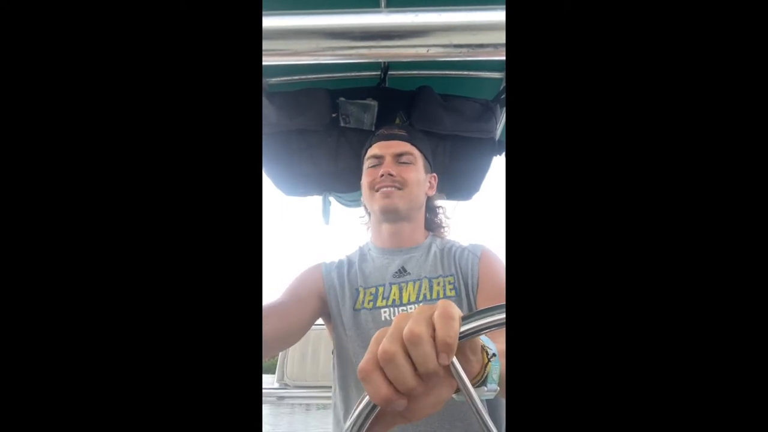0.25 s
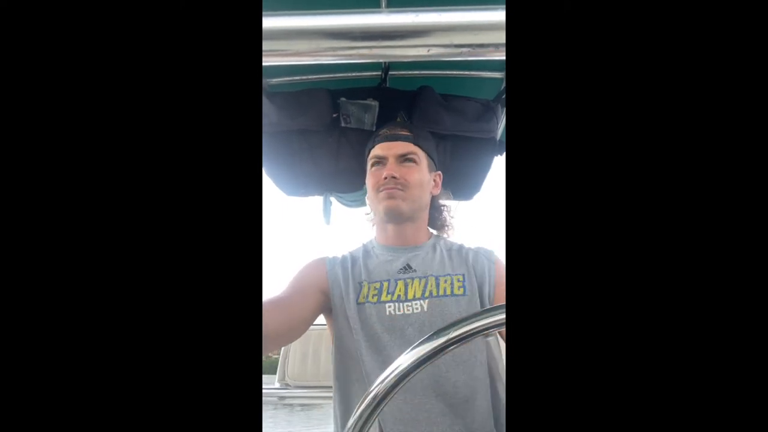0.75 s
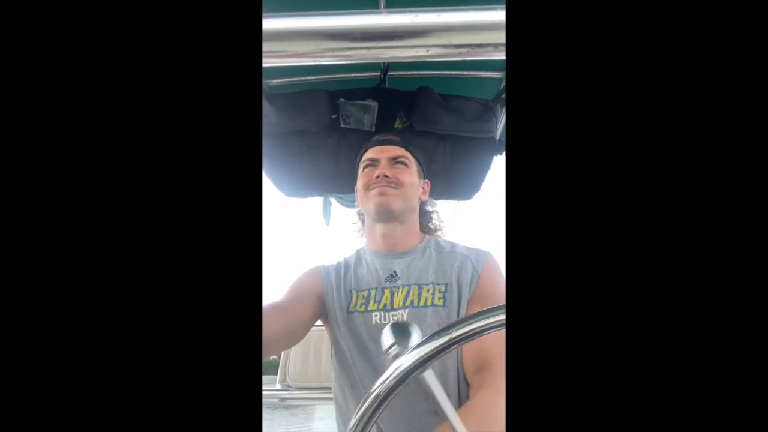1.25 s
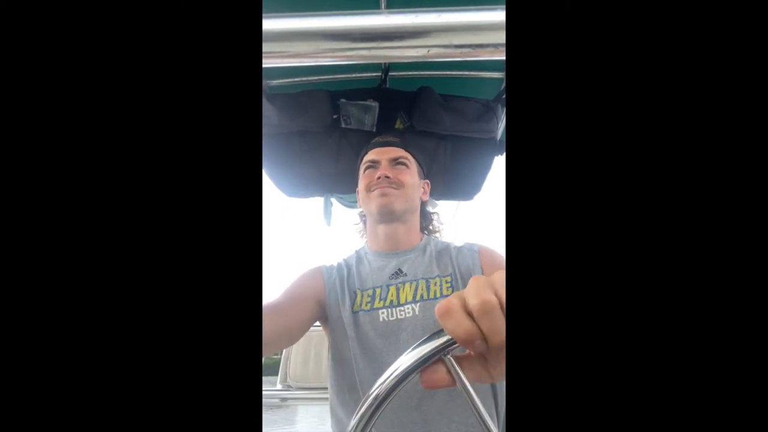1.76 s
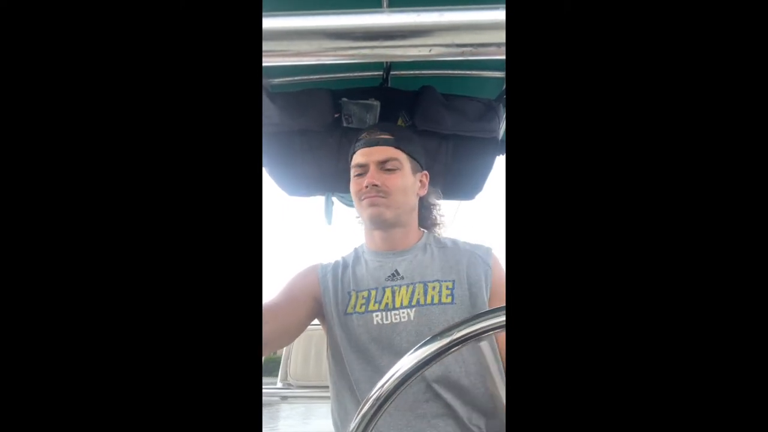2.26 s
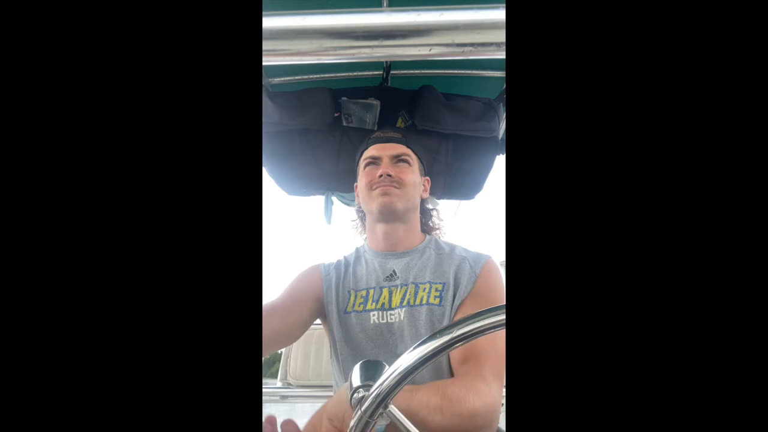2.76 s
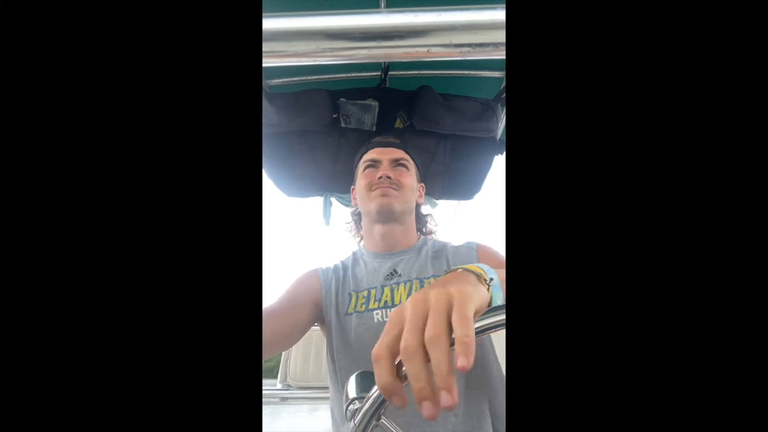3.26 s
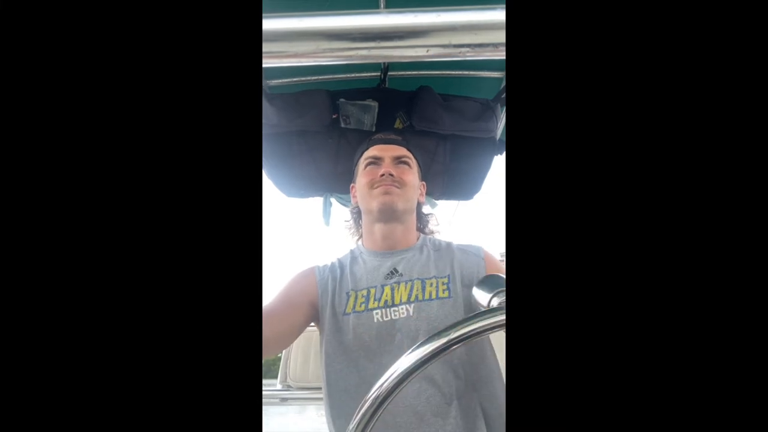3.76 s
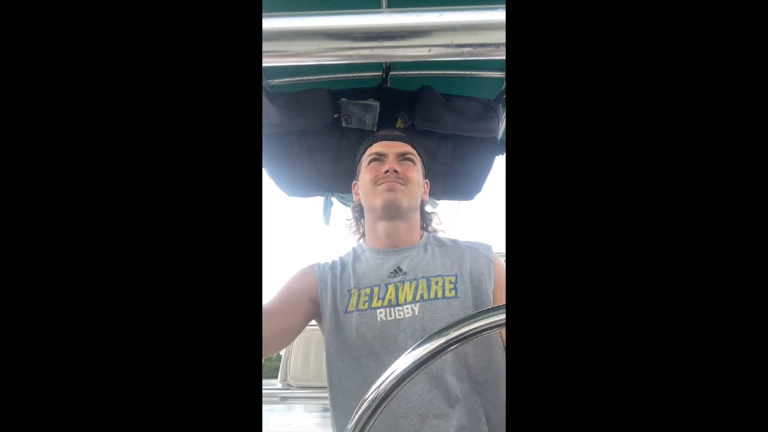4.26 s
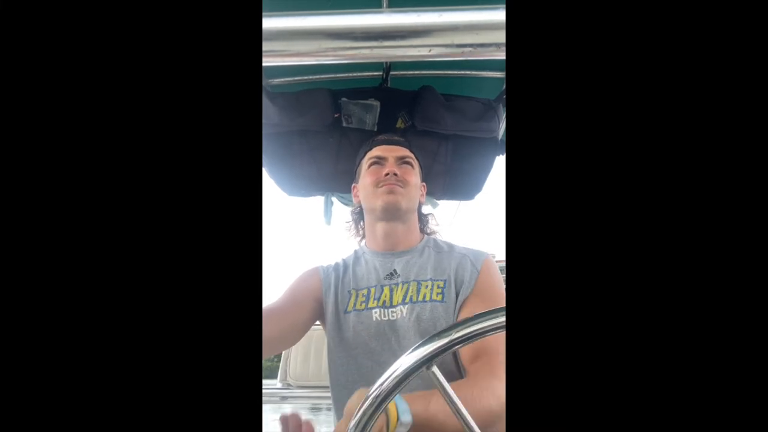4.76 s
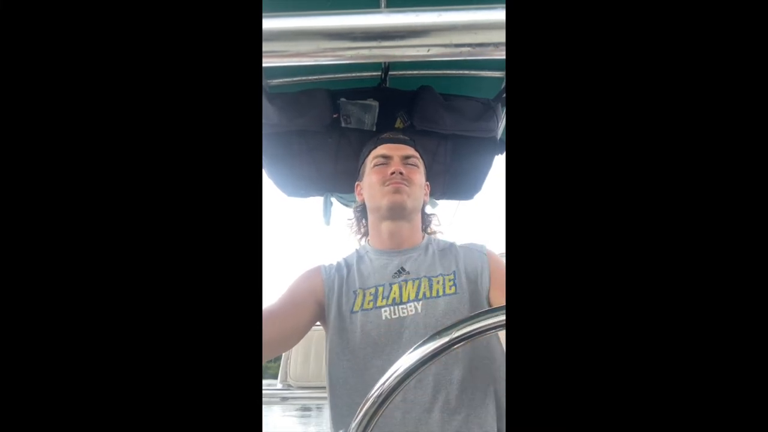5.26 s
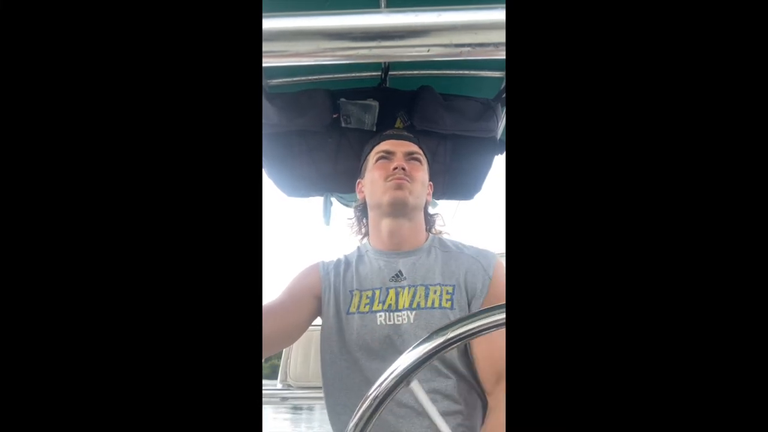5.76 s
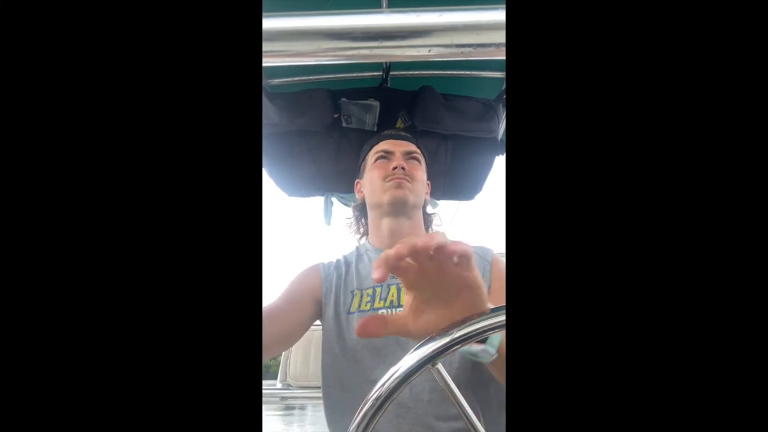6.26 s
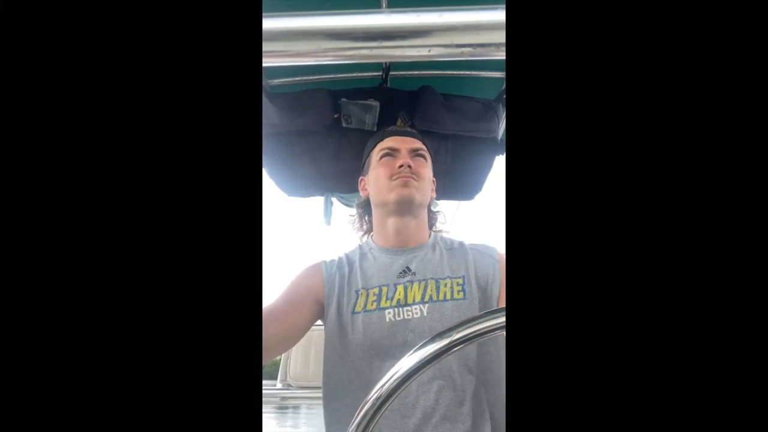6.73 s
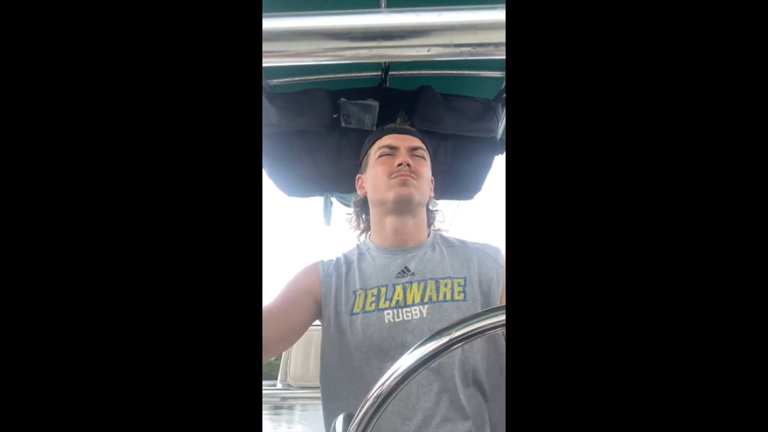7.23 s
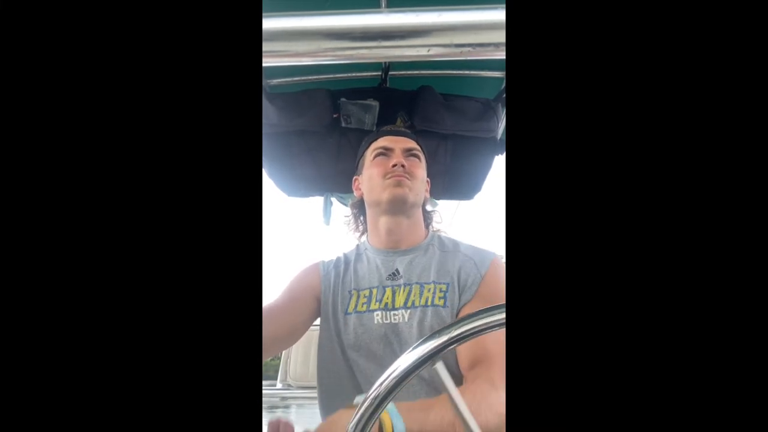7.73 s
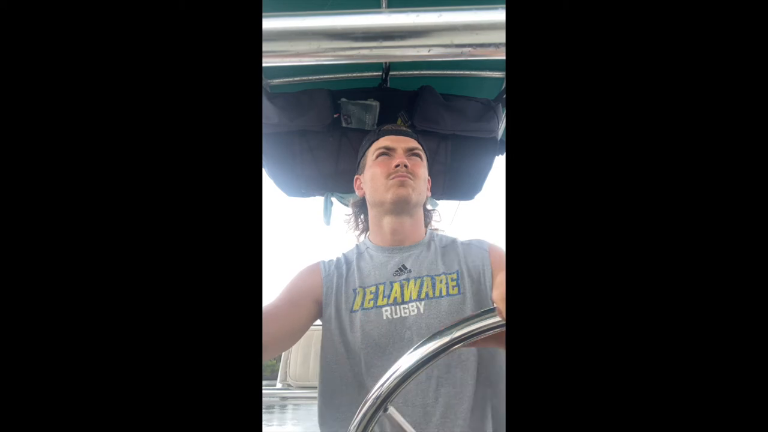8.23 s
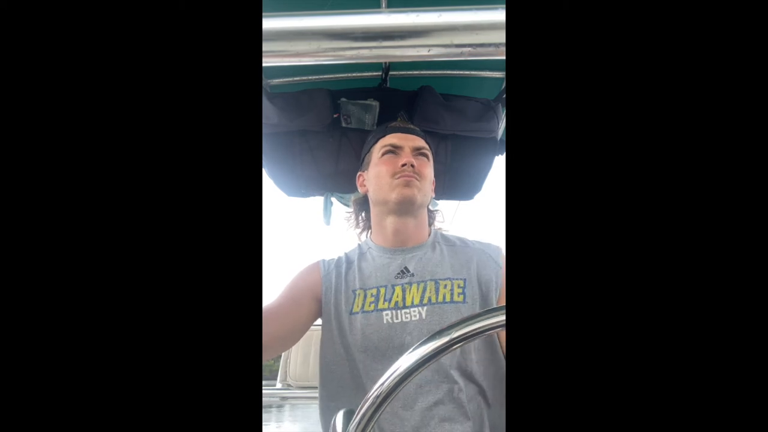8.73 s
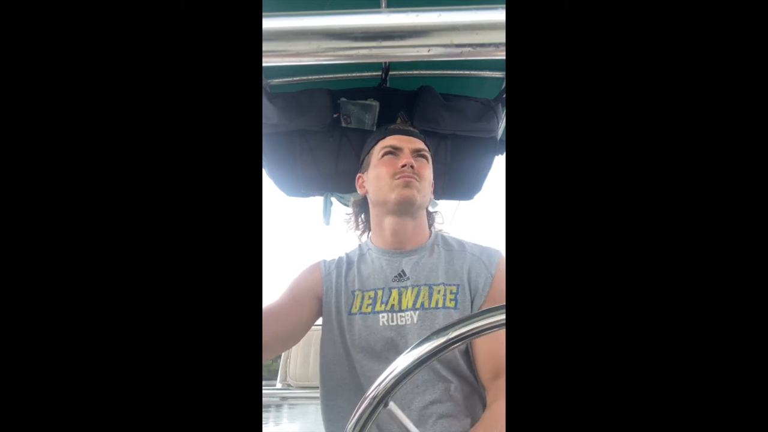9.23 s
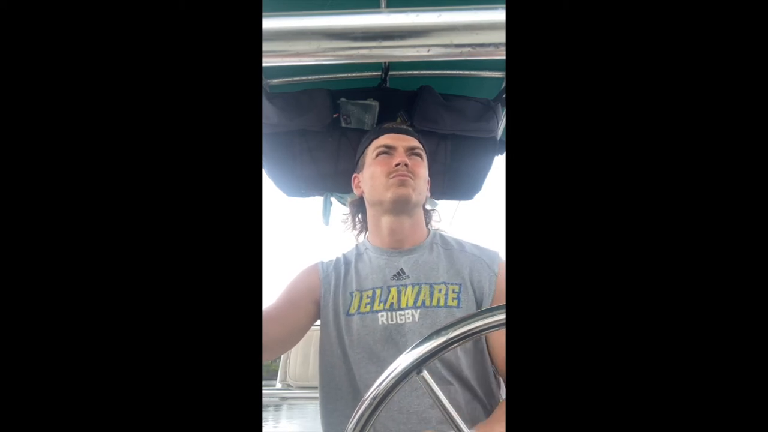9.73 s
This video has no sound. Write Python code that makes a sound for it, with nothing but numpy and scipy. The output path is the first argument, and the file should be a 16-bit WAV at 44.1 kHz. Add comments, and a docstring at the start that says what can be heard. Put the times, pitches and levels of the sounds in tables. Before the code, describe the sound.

Low boat-engine rumble pulses unevenly under soft water hiss, as wheel spins give brief ratcheting grinds, small metallic ticks and dull console knocks.

```python
"""Outboard motor at low speed

Heard by a phone on the console of an open boat: noise through the resonances of hull, deck, panels and
rails makes an uneven, throbbing boom, hum and rattle; strong exhaust beats are short tone bursts.
Shaped noise makes the water wash and spray hiss. When the wheel is spun, the steering gear grinds as
trains of tooth impulses and pings; single ticks and dull knocks are short decaying bursts."""
import sys
import numpy as np
from scipy import signal
from scipy.fft import rfft, irfft, next_fast_len
from scipy.io import wavfile
from scipy.ndimage import uniform_filter1d

SR = 44100
rng = np.random.default_rng(int(sys.argv[2]) if len(sys.argv) > 2 else 0)


def transcribe(signal):
    """Save signal, clipped to [-1, 1], as a 16-bit WAV file at the path in sys.argv[1]."""
    frames = np.atleast_2d(signal).T
    limited = np.clip(frames, -1, 1)
    pcm = np.round(limited * 32767).astype(np.int16)
    wavfile.write(sys.argv[1], SR, pcm)


N = 440559
T = np.arange(N) / SR
SIZE = next_fast_len(N)
HZ = np.maximum(np.arange(SIZE // 2 + 1) * SR / SIZE, 1.)

# likeness of the sound at the phone's two ports: (frequency [Hz], likeness [0-1])
LIKENESS = [(60, .97), (180, .98), (320, .95), (450, .45), (6000, .35), (8300, .95), (16000, .82)]
# level difference of the ports: (frequency [Hz], left minus right [dB])
PORT_TILT = [(60, 1.5), (110, 2.0), (200, 1.5), (270, -1.5), (400, -1), (520, 3), (800, 3.0), (1290, 1.5),
             (2380, 0.5), (4400, 1.5), (8120, 0.5), (15000, 0.0)]
# phase that the right port gains on its detour round the console: (frequency [Hz], phase [rad])
PORT_DETOUR = [(400, 0), (480, -2), (600, -1), (1200, -3), (1700, -4), (2400, -9), (4200, -14), (6500, -21)]
# spins of the wheel: (start [s], length [s], level [dB], swell by the end [dB], mean tooth rate [Hz])
WHEEL_SPINS = [(0.585, .36, -46, -2, 75.04), (0.961, 0.17, -49, 3, 62.7), (1.136, 0.21, -41.5, -2.5, 65.3),
               (1.842, .2, -47, -5, 62.6), (2.066, .3, -44, -2.5, 70.35), (2.441, .5, -51.5, -12, 71.7),
               (3.155, .8, -57.5, -1.5, 68.8), (4.186, .42, -47.5, 3.5, 72.74),
               (5.034, 0.092, -59, 3.5, 59.6), (5.218, .68, -50, 5.5, 62.1), (6.053, .7, -61.5, -3.5, 68.4),
               (6.841, .55, -56, 7, 58.1), (7.424, .36, -46.5, 0, 69), (8.031, 0.14, -57, 5.5, 54.1),
               (8.298, .2, -45, -3, 49.74), (8.551, 0.72, -52, 1.5, 32.95), (9.394, 0.76, -70, -4, 30.4)]


def undb(db):
    """Decibel definition: amplitude gain is ten to the level over twenty."""
    return 10 ** (np.asarray(db) / 20)


def unit(x):
    """Normalisation of power: scaled to rms 1."""
    return x / np.sqrt(np.mean(x ** 2))


def curves(table):
    """Piecewise linear control: each column after time as a value per sample."""
    s, *columns = np.transpose(table)
    return [np.interp(T, s, column) for column in columns]


def slope(points):
    """Spectral envelope: a value per frequency, straight on a log axis."""
    hz, value = np.transpose(points)
    return np.interp(np.log(HZ), np.log(hz), value)


# between the ports: a detour in phase up to the middle, then a steady lag in the treble
PORT_LAG_S, PORTS_AGREE_HZ = 0.00018, 8580
DETOUR_PHASE = np.interp(HZ, *np.transpose(PORT_DETOUR))
LAG_PHASE = -2 * np.pi * (HZ - PORTS_AGREE_HZ) * PORT_LAG_S
PATH = np.exp(1j * np.where(HZ < PORT_DETOUR[-1][0], DETOUR_PHASE, LAG_PHASE))
LEAN = undb(slope(PORT_TILT) / 2)  # half the difference for each port
LIKE_BY_HZ = slope(LIKENESS)


def resonant(modes):
    """Modal superposition: gain per frequency of steep resonances whose powers add."""
    power = sum(undb(2 * db) / (1 + (2 * (HZ - hz) / width) ** 2) ** 2 for hz, width, db in modes)
    return np.sqrt(power)


def walk(rate):
    """Smoothed random modulation: levels held 1 / rate s and slewed twice, rms 1."""
    k = int(SR / rate)
    held = np.repeat(rng.standard_normal(N // k + 1), k)
    return unit(uniform_filter1d(uniform_filter1d(held, k), k)[:N])


def lurching(level_db, depth_db):
    """Amplitude modulation: a gain whose level wanders at random."""
    return undb(level_db + depth_db * walk(14.))


def ports(drive, colour, like=LIKE_BY_HZ, path=PATH):
    """Partial coherence: the right port hears a share of the left port's filtered noise along the path."""
    a, b = rfft(drive * rng.standard_normal((2, N)), SIZE) * colour
    like = np.clip(like, 0, 1)
    right = like * path * a + np.sqrt(1 - like ** 2) * b
    return irfft(np.array([a * LEAN, right / LEAN]), SIZE)[:, :N]


def ringing(drive, modes):
    """Resonance: one noise under the envelope drive through modes, rms 1."""
    spectrum = rfft(drive * rng.standard_normal(N), SIZE)
    return unit(irfft(spectrum * resonant(modes), SIZE)[:N])


def fading(times, sizes, decay_s):
    """Exponential decay: an envelope that jumps at each time and dies away."""
    kicks = np.zeros(N)
    np.add.at(kicks, np.minimum((times * SR).astype(int), N - 1), sizes)
    return signal.lfilter([1], [1, -np.exp(-1 / (decay_s * SR))], kicks)


def bumps(rows, width_s):
    """Gaussian envelopes: brief rises in dB around given times."""
    s, db = np.transpose(rows)
    kicks, t = np.zeros(N), np.arange(-4000, 4001) / SR
    kicks[np.minimum((s * SR).astype(int), N - 1)] = db
    return signal.fftconvolve(kicks, np.exp(-(t / width_s) ** 2), mode="same")


def waver(x, depth, rate):
    """Frequency modulation: reading at a wandering speed makes resonances drift in pitch."""
    place = np.arange(N) + np.cumsum(depth * walk(rate))
    return np.array([np.interp(place, np.arange(N), channel, period=N) for channel in x])


def pings(times, sizes, count):
    """Impulse response: each blow rings a few pitches picked by chance, each with its own force."""
    # pitches at which a single tooth or tick rings: (frequency [Hz], relative level [dB])
    ping_modes = [(1612, 1), (2050, -4), (2450, -2.5), (3046, -5.5), (3400, -6.5), (4150, -10),
                  (4800, -14.5), (6050, -19.5), (7050, -12.5), (8820, -16.5)]
    scatter_db, stray_share, decay_s = 3.5, .04, .004
    out, t = np.zeros(N + 1500), np.arange(1500) / SR
    hz, db = np.transpose(ping_modes)
    picks = rng.integers(len(hz), size=(len(times), count))
    chance = rng.standard_normal((len(times), 2, count))
    for s, size, k, (stray, force) in zip(times, sizes, picks, chance):
        gain = size * undb(db[k] + scatter_db * np.clip(force, -2, 2))
        pitches = hz[k] * (1 + stray_share * stray)
        ring = gain @ np.sin(2 * np.pi * np.outer(pitches, t))
        out[int(s * SR):int(s * SR) + len(t)] += ring * np.exp(-t / decay_s)
    a = rfft(out[:N], SIZE)
    return irfft(np.array([a * LEAN, a * PATH / LEAN]), SIZE)[:, :N]


def shudder():
    """Amplitude modulation: level rises as the motor shudders, taken about their running mean."""
    # rails and steering rattle harder for a moment: (time [s], rise before weighting [dB])
    shudder_rows = [(0.103, 2), (0.217, 4), (0.4, 1.5), (0.658, 4.5), (0.739, 1.5), (0.875, 2), (1.005, 1),
                    (1.264, 4), (1.316, 3.0), (1.691, 1.5), (1.819, 4), (1.903, 5), (2.068, 2.0),
                    (2.212, 1.5), (2.4, 3), (2.757, 5), (2.851, 1), (3.002, 4), (3.086, 3), (3.319, 5),
                    (3.481, 3), (3.559, 4), (3.613, 5), (3.723, 5.5), (3.848, 3), (3.974, 4.5),
                    (4.275, 3.5), (4.383, 2), (4.519, 1), (4.619, 0), (4.86, 2.5), (5.115, 3.0),
                    (5.269, 3.5), (5.413, 3), (5.696, 5), (5.818, 3.5), (5.979, 3.0), (6.059, 1.5),
                    (6.145, 2.0), (6.299, 3), (6.418, 3.5), (6.544, 6.5), (6.792, 2.5), (6.929, 2),
                    (6.987, 5.5), (7.097, 2), (7.243, 1.5), (7.442, 5.5), (7.662, 2.5), (7.777, 4.5),
                    (7.965, 1), (8.087, 1), (8.376, 0.5), (8.496, 2.0), (8.552, 3.5), (8.729, 5.5),
                    (8.905, 2.5), (9.046, 3.5), (9.228, 4.5), (9.376, 5), (9.452, 4), (9.689, 2.5),
                    (9.819, 3.5)]
    rise = bumps(shudder_rows, width_s=0.017)
    return rise - uniform_filter1d(rise, size=SR // 3)


def spray_hiss():
    """Broadband noise: a thin spray hiss, unsteady in level."""
    # spectrum of the hiss: (frequency [Hz], relative density [dB])
    hiss_spectrum = [(1500, -30), (3500, -8.5), (6000, -14), (9500, -1), (14000, -4.5), (16000, -13.5)]
    return undb(-63.5) * unit(ports(undb(2.9 * walk(16)), undb(slope(hiss_spectrum))))


def water_wash():
    """Broadband noise: water washing by, with random swells, rms 1."""
    # spectrum of the wash: (frequency [Hz], relative density [dB])
    wash_spectrum = [(250, -16), (420, 3), (700, -4.5), (1300, -4), (2200, -12.5), (3500, -24),
                     (4500, -23.5), (6200, -37.5), (16000, -70.5)]
    return unit(ports(undb(1.63 * walk(40)), undb(slope(wash_spectrum))))


def knocks(decay_s=0.0086, crack_s=0.0045):
    """Damped vibration: each knock rings at its pitch and two rough neighbours, over a short crack."""
    # dull knocks in the console: (time [s], relative level [dB], pitch [Hz], left minus right [dB])
    knock_rows = [(0.5732, -28, 1020, 2.5), (0.653, -23, 1115, 5), (0.651, -27, 2570, .5),
                  (0.7256, -30, 1600, 2), (0.864, -28, 1620, 1.0), (0.9946, -24, 1540, -1.5),
                  (1.1394, -28, 1610, 1), (1.2777, -23, 1630, .5), (1.214, -20.5, 1036, 15),
                  (1.3, -20, 1000, 14), (1.811, -25, 1513, -5), (1.856, -29, 1750, 0.5),
                  (1.413, -27, 1060, 2), (1.981, -36, 1080, -2), (3.1925, -36, 1100, 4),
                  (3.443, -25, 1060, 1.5), (3.95, -28, 1323, -6), (4.159, -36, 1480, 4),
                  (4.255, -23, 996, 9), (4.486, -33, 1060, 3.5), (4.69, -21, 1040, 3),
                  (5.242, -22, 1050, 0.0), (5.316, -28, 1080, 2), (5.3697, -35, 1043, 3),
                  (5.6545, -18, 1055, 6), (6.6874, -20, 1075, 4), (6.773, -23, 1087, 7),
                  (6.8143, -21, 1050, -1), (7.202, -19.5, 1066, -2), (7.429, -23, 1090, 2.0),
                  (7.701, -25, 1027, 6), (7.882, -33, 1069, 1), (8.003, -29, 2035, -1),
                  (8.15, -25, 1990, 0), (8.4404, -26, 1014, 8), (8.7206, -25, 1159, -1),
                  (8.726, -26, 1510, -7), (8.77, -20, 994, 8), (8.9771, -20.5, 1560, 1.5),
                  (9.1249, -20, 1054, 0), (9.2167, -23, 1510, -2), (9.262, -23.5, 2000, 3),
                  (9.643, -31, 1006, -4)]
    out, t = np.zeros((2, N)), np.arange(2400) / SR
    for s, level_db, hz, pan_db in knock_rows:
        apart = 1 + 0.345 * rng.random(2) * np.array([-1, 1])
        neighbours = np.sin(2 * np.pi * hz * np.outer(apart, t)).sum(axis=0)
        ring = np.sin(2 * np.pi * hz * t) + 0.53 * neighbours
        ring = ring * (1 - np.exp(-t / 0.00079)) * np.exp(-t / decay_s)
        crack = 0.34 * uniform_filter1d(rng.standard_normal(len(t)), size=7) * np.exp(-t / crack_s)
        at = min(int(s * SR), N - len(t))
        gain = undb(level_db - 5.5 + np.array([[pan_db], [-pan_db]]) / 2)
        out[:, at:at + len(t)] += gain * (ring + crack)
    return out


def ticks():
    """Impact excitation: each tick has a bright snap, a brief ring and a duller knock in the console."""
    # loudest single ticks: (time [s], relative level [dB], body relative to snap before weighting [dB])
    tick_rows = [(0.5487, -38.5, 3), (0.6085, -42.5, -1), (0.7256, -34, 10.5), (0.7532, -33, -1),
                 (0.8016, -39, -4), (0.865, -25.5, 0.5), (0.995, -37, 0.5), (1.03, -37.5, 3.5),
                 (1.0786, -34.5, 2), (1.138, -44, 1), (1.213, -41, -2), (1.298, -34.5, 4.5),
                 (1.308, -38.5, -5), (1.358, -36.5, 4.5), (1.392, -47, -0.5), (1.412, -45.5, 0),
                 (1.647, -32, -16), (1.854, -40, 5), (1.8751, -39, 0), (1.908, -38, 9.5),
                 (1.9807, -34, -18), (2.0554, -36.5, 10.5), (2.135, -42, 1), (2.2967, -44, 5),
                 (2.4828, -38.5, -0.5), (2.722, -36.5, 4.5), (3.5239, -36, -6), (4.1633, -37.5, -10),
                 (4.184, -36, 2.5), (4.2227, -45, -2), (4.2545, -39.5, -5), (4.2631, -34.5, 8),
                 (4.32, -31.5, -12.5), (4.349, -33, 3.5), (5.061, -37, -2), (5.316, -38.5, 0),
                 (5.354, -37.5, -4.5), (5.469, -36.5, 2.5), (5.692, -36.5, 11.5), (5.748, -31, -12.5),
                 (5.87, -35, 0.5), (6.186, -38, -10), (6.331, -37, -1), (7.0967, -39, 5.5),
                 (7.146, -39.5, 4), (7.1975, -36.5, 10), (7.2724, -45, -1.5), (7.29, -35.5, -8),
                 (7.311, -41, -2), (7.427, -33, 5.5), (7.439, -32.5, 4), (7.497, -35, -3),
                 (7.57, -33.5, -5.5), (7.6978, -33, 5), (8.087, -38.5, 7), (8.123, -28, -4),
                 (8.3027, -38.5, -2), (8.345, -41, 1), (8.361, -39, -5.5), (8.385, -42, 5.5),
                 (8.441, -39, 4), (8.484, -39.5, 11.5), (8.5969, -38.5, -7), (8.6478, -42, 0.5),
                 (8.699, -31, -2), (8.772, -43, -11.5), (8.7927, -31.5, -2.5), (8.8223, -41, -10),
                 (8.877, -33.5, -1.5), (8.9404, -43.5, -3), (8.976, -40.5, -1.5), (9.039, -39, -1),
                 (9.0678, -36.5, 5.5), (9.108, -32, -9), (9.141, -36, -2.5), (9.299, -44.5, -7),
                 (9.312, -34, -11.5)]
    # spectra of the snap and the body knock: (frequency [Hz], relative density [dB])
    snap_spectrum = [(1500, -33), (4000, 0), (7000, 7), (10000, 0.5), (14000, -7), (16000, -13)]
    body_spectrum = [(500, -28), (1500, 6.5), (3500, -8), (6000, -23.5)]
    s, level_db, body_db = np.transpose(tick_rows)
    snap = ports(fading(s, undb(level_db), .002), undb(slope(snap_spectrum)))
    body = ports(fading(s, undb(level_db + body_db), 0.0066), undb(slope(body_spectrum)))
    return undb(-4.5) * snap + undb(5.0) * body + pings(s, undb(level_db - 5.0), count=3)


def moan():
    """Resonance: narrow-band noise, a short low moan from the steering during a hard spin."""
    start, length, level_db = 1.198, 0.22, -38.5  # s, s, dB
    shape = np.clip(np.minimum(T - start, start + length - T) / 0.026, 0, 1)
    mode = [(443, 31, 0)]  # Hz, width Hz, dB
    return undb(level_db) * shape * unit(ports(1., resonant(mode), 0.73, path=0.58))


def spinning():
    """Power addition: each spin swells, holds in jerks and dies down to a faint resting rub."""
    rise_s, decay_s, rest_db, jerk_db = 0.025, 0.089, -58, 1.5
    power = undb(2 * rest_db)
    for start, length, level_db, swell_db, _ in WHEEL_SPINS:
        since = T - start
        shape = np.clip(since / rise_s, 0, 1) * np.exp(-np.maximum(since - length, 0) / decay_s)
        power = power + (undb(level_db + swell_db * np.clip(since / length, 0, 1)) * shape) ** 2
    jerks = walk(50)
    jerks = jerks - uniform_filter1d(jerks, size=SR // 7)  # quick jerks only, no slow drift
    return np.sqrt(power) * undb(jerk_db * unit(jerks))


def steering():
    """Periodic impacts: gear teeth meet at the wheel's pace with varied force, over a patchy rub."""
    # ringing of the wheel: (frequency [Hz], width [Hz], relative level [dB])
    wheel_modes = [(6050, 150, -11), (7050, 160, 0), (8820, 400, -14)]
    # spectrum of the grind: (frequency [Hz], relative density [dB])
    grind_spectrum = [(250, -29.5), (440, 14), (700, 11.5), (1500, 14), (3300, 0), (5000, -2.5),
                      (9500, -3.5), (11200, -16.5), (13000, -10.5), (16000, -19)]
    # console resonances that the gear excites: (frequency [Hz], width [Hz], relative level [dB])
    gear_modes = [(1622, 125, 24.5), (2410, 89, 16), (2570, 79, 15.5), (3050, 110, 11), (3416, 30, 13.5)]
    start, length, *_, teeth_hz = np.transpose(WHEEL_SPINS)
    pace_hz = np.interp(T, start + length / 2, teeth_hz) * (1 + .2 * walk(40))
    turns = np.cumsum(pace_hz) / SR
    times = T[1:][np.diff(np.floor(turns)) > 0]
    common, *own_forces = np.clip(rng.standard_normal((4, len(times))), -2, 2)
    spin = spinning()
    hard = spin / (spin + undb(-54))  # softer spins rub smoothly
    colour = np.hypot(undb(slope(grind_spectrum)), resonant(gear_modes))
    low, high = 1 / (1 + (HZ / 2800) ** 4), 1 / (1 + (6000 / HZ) ** 4)
    middle = np.abs(1 - low - high)
    grind = 0
    for share, own in zip((low, middle, high), own_forces):
        teeth = unit(fading(times, undb(1.5 * common + 3.8 * own), 0.0054))
        patchy = undb(1.4 * walk(22) + 0.59 * shudder())
        grind = grind + ports((0.7 + 1.28 * hard * teeth) * patchy, colour * np.sqrt(share))
    ring = ports(undb(3.1 * walk(25)), resonant(wheel_modes))
    tooth_sizes = spin[(times * SR).astype(int)] * undb(3)
    return spin * (grind + undb(5.0) * ring) + pings(times, tooth_sizes, count=4)


def swells():
    """Modal ringing: two console panels ring out clearly for a moment, louder at the left port."""
    # (time [s], low panel relative level [dB], high panel relative level [dB], high panel pitch [Hz])
    swell_rows = [(.95, -55, -45, 1060), (1.31, -49, -31, 1055), (1.89, -40, -41, 1054),
                  (1.96, -55, -48, 1090), (2.15, -46, -38, 1126), (2.2, -48, -37, 995),
                  (2.25, -52, -34, 1040), (2.3, -55, -34, 1097), (2.42, -48, -41, 1035),
                  (2.75, -33, -42, 1060), (4.28, -49, -43, 1054), (4.36, -40, -42, 1100),
                  (4.42, -47, -40, 1035), (4.55, -36, -36, 1030), (4.62, -48, -37, 1066),
                  (5.27, -40, -33, 1058), (5.41, -28.5, -29, 1094), (5.52, -51, -34, 1058),
                  (5.66, -32.5, -55, 1070), (5.83, -32, -36, 1090), (5.93, -46, -32, 1049),
                  (6.04, -34, -44, 1090)]
    half_s, low_hz = 0.023, 806
    out = np.zeros(N)
    for s, low_db, high_db, high_hz in swell_rows:
        near = slice(int((s - 3 * half_s) * SR), int((s + 3 * half_s) * SR))
        t = T[near]
        low = undb(low_db) * np.sin(2 * np.pi * low_hz * t)
        high = undb(high_db) * np.sin(2 * np.pi * high_hz * t)
        out[near] += (low + high) * np.exp(-((t - s) / half_s) ** 2)
    return out * undb(np.array([[4.], [1.5]]))


def panel_tone(throb):
    """Narrow resonance: a lone panel tone fades, then partly returns."""
    # level of the tone: (time [s], level [dB])
    tone_level = [(0, -48.5), (1.2, -49), (1.6, -60), (3, -70), (4, -64.5), (10, -59.5)]
    # the panel's mode: (frequency [Hz], width [Hz], relative level [dB])
    tone_mode = [(1524, 24, 0)]
    return undb(curves(tone_level)[0]) * ringing(undb(1.1 * throb), tone_mode)


def buzz(throb):
    """Antiphase radiation: resonances push one port while pulling the other; a second set takes over."""
    # the first and second set: (frequency [Hz], width [Hz], relative level [dB])
    early_modes = [(1178, 20, 0), (2005, 24, -9)]
    late_modes = [(1270, 30, -6.5), (1400, 40, -2), (1463, 30, -2.5), (2210, 60, -10), (2550, 40, -13.5),
                  (3250, 120, -22)]
    # (time [s], early buzz level [dB], late buzz level [dB])
    buzz_levels = [(0, -43, -58), (1.1, -43, -58), (1.4, -52, -58), (1.8, -52, -54), (1.9, -44, -48),
                   (3, -46, -46), (4.1, -50, -45), (5.2, -52, -46), (6.5, -60, -43), (8, -60, -43),
                   (9.4, -60, -42), (10, -60, -45)]
    early_db, late_db = curves(buzz_levels)
    early = undb(early_db) * ringing(undb(2.5 * throb), early_modes)
    late = undb(late_db) * ringing(undb(2.5 * throb), late_modes)
    return (early + late) * np.array([[1], [-1]])


def rattle(level_db):
    """Forced vibration: rails rattle with drifting pitch, under one lurching level with the wash."""
    # rail resonances: (frequency [Hz], width [Hz], relative level [dB])
    rail_modes = [(1296, 136, 7.5), (1446, 96, 5.5), (1600, 32, 0.5), (1810, 260, -3), (2032, 64, 5.5),
                  (2360, 127, 0), (2640, 110, -6), (2858, 49, -5.5), (3140, 60, -8.5), (3324, 39, -6.5),
                  (4000, 32, -22)]
    rails = unit(ports(undb(2.5 * walk(40)), resonant(rail_modes), .55, path=1))
    lurch_db = 1.27 * np.tanh(unit(np.gradient(walk(20.))))
    mix = undb(-2.5) * waver(rails, .005, 2.5) + undb(1.03) * water_wash()
    return undb(level_db + lurch_db + 1.2 * shudder()) * mix


def panel_hum(throb, level_db):
    """Forced resonance: rough firings hum in the console panels, with drifting pitch."""
    # panel resonances: (frequency [Hz], width [Hz], relative level [dB])
    panel_modes = [(610, 53, -6.5), (783.5, 41, 1), (851.3, 63, -1), (918, 61, -4.5), (1029, 56, -1.5),
                   (1068, 48, -1), (1105, 136, -7)]
    hum = unit(ports(undb(1.4 * throb + 0.91 * walk(25)), resonant(panel_modes), 0.74, path=0.96))
    return lurching(level_db + 0.47 * shudder(), 1.25) * waver(hum, .009, 4.)


def deck_drum(throb):
    """Forced resonance: the deck drums under the throbbing motor."""
    # deck resonances: (frequency [Hz], width [Hz], relative level [dB])
    deck_modes = [(261.1, 24.3, 0.5), (315, 40, -14), (355.5, 68, -19), (439.6, 31.5, -20)]
    # (time [s], mean level [dB])
    drum_level = [(0, -29.5), (.47, -27.5), (.65, -35), (1.1, -28.5), (1.6, -30), (5, -28), (6.3, -29),
                  (7.1, -25.5), (7.6, -30), (8.3, -24), (8.6, -30), (9.6, -25.5), (10, -30.5)]
    return lurching(curves(drum_level)[0], 1.14) * unit(ports(undb(1.2 * throb), resonant(deck_modes)))


def deep_rumble(throb):
    """Low-frequency resonance: a throbbing rumble, raised now and then by a thump."""
    # lowest resonances: (frequency [Hz], width [Hz], relative level [dB])
    deep_modes = [(63.5, 26, -4.5), (77, 30, -4), (94, 15, -7.5), (111, 13, -3), (116.8, 13, 0),
                  (134.3, 17, -1.5), (145, 6.5, -10)]
    # (time [s], mean level without thumps [dB])
    rumble_level = [(0, -27.5), (1, -28), (1.7, -26), (3.5, -28), (4.5, -27), (7, -27), (8.3, -28.5),
                    (9.2, -26.5), (10, -27)]
    # thumps: (time [s], rise [dB])
    thump_rows = [(1.25, 7), (1.65, 7), (3.22, 1), (3.36, 8.5), (5.39, 3), (7.37, 5), (8.15, 10),
                  (8.35, 7.5), (8.65, 4)]
    level_db = curves(rumble_level)[0] + bumps(thump_rows, width_s=0.031)
    return lurching(level_db, 1) * unit(ports(undb(0.41 * throb), resonant(deep_modes)))


def hull_boom(throb, level_db):
    """Forced resonance: the rough, throbbing boom of the hull, running on beneath the strong beats."""
    # hull resonances: (frequency [Hz], width [Hz], relative level [dB])
    hull_modes = [(164.4, 14.4, -2.5), (175.4, 13.3, 1.5), (215, 42, -5.5), (221.5, 21, -4)]
    return lurching(level_db - 2.5, 0.5) * unit(ports(undb(1.0 * throb), resonant(hull_modes)))


def beats():
    """Tone bursts: each exhaust beat swells and dies within a few swings of the hull."""
    # strong beats, each at its own hull pitch: (time [s], relative level [dB], pitch [Hz])
    beat_rows = [(0.219, -15.5, 184), (0.332, -16, 181), (0.632, -17, 198), (0.824, -16, 208),
                 (0.881, -15, 202), (0.953, -19, 207), (1.001, -14.5, 183), (1.071, -11, 208),
                 (1.223, -12, 190.6), (1.698, -17, 203), (1.862, -16.5, 175), (1.922, -11.5, 191),
                 (1.976, -16, 180), (2.041, -16.5, 208), (2.114, -9.5, 203), (2.166, -11, 200),
                 (2.272, -7.5, 200), (2.391, -13.5, 216), (2.457, -11.5, 184.5), (2.539, -12, 193),
                 (2.617, -22, 194), (2.683, -15, 175), (2.758, -13.5, 181), (2.843, -13.5, 205),
                 (2.91, -13.5, 188), (2.996, -12.5, 184), (3.146, -9.5, 178.4), (3.236, -17, 184.4),
                 (3.318, -16.5, 213), (3.392, -11, 184), (3.474, -12.5, 174), (3.552, -11, 182),
                 (3.61, -11.5, 179), (3.71, -11.5, 201), (3.781, -12, 174), (3.826, -12.5, 195),
                 (3.977, -14.5, 220), (4.033, -13, 176), (4.08, -10.5, 210), (4.237, -14, 217),
                 (4.284, -16, 191), (4.352, -10.5, 207), (4.42, -14, 201), (4.479, -14, 204),
                 (4.527, -12, 173), (4.586, -26, 195), (4.64, -18, 203), (4.697, -11, 198),
                 (4.755, -11, 184), (4.857, -10, 194.5), (5.029, -13, 201.6), (5.112, -13.5, 189.8),
                 (5.248, -12, 208), (5.418, -16, 191), (5.481, -16.5, 205), (5.535, -15, 182),
                 (5.596, -17, 183), (5.697, -11, 202), (5.762, -14, 189), (5.84, -12, 185),
                 (5.921, -12, 188), (5.977, -7.5, 179), (6.106, -14, 195), (6.156, -13, 200.5),
                 (6.251, -13, 198.5), (6.396, -11.5, 194), (6.45, -13.5, 191), (6.541, -18, 196),
                 (6.641, -13, 198), (6.7, -15, 202), (6.787, -15, 194), (6.86, -8.5, 194),
                 (6.924, -13.5, 185), (6.994, -8, 187), (7.097, -12.5, 197.3), (7.148, -11.5, 182),
                 (7.217, -7.5, 181), (7.304, -15, 180), (7.46, -11.5, 206.4), (7.59, -12.5, 197.5),
                 (7.675, -12, 198.2), (7.737, -13, 190.5), (7.8, -9, 186.8), (7.857, -19, 191),
                 (7.907, -15, 209.4), (7.963, -16, 190), (8.031, -9, 193), (8.085, -15, 186),
                 (8.168, -9.5, 186.5), (8.255, -13.5, 190), (8.328, -15, 189), (8.388, -19, 190),
                 (8.486, -16, 184), (8.592, -15, 209), (8.64, -15, 185), (8.724, -16, 190),
                 (8.892, -16, 200), (9.081, -14, 197), (9.135, -13, 179.4), (9.219, -15, 188),
                 (9.282, -16, 192), (9.333, -15, 215), (9.385, -10.5, 205), (9.445, -14.5, 199),
                 (9.508, -15, 199), (9.62, -13.5, 201), (9.678, -16.5, 189), (9.752, -16, 174),
                 (9.819, -12, 179), (9.946, -17, 206)]
    half_s = 0.019
    out = np.zeros(N)
    for s, level_db, hz in beat_rows:
        near = slice(max(int((s - 3 * half_s) * SR), 0), int((s + 3 * half_s) * SR))
        t = T[near] - s
        swing = np.cos(2 * np.pi * (hz * t + rng.random()))
        out[near] += undb(level_db) * np.exp(-(t / half_s) ** 2) * swing
    return out * undb(np.array([[-.5], [-2.]]))


def motor():
    """Amplitude-modulated forcing: one uneven throb drives hull, deck and panels under a lurching load."""
    # (time [s], hull boom relative level [dB], panel hum [dB], rattle of rails and wash [dB])
    load_levels = [(0, -23.5, -39, -41.5), (.55, -25, -37.5, -43.5), (1.0, -21.5, -35.5, -43),
                   (1.32, -20.5, -34.5, -38), (1.5, -26, -39, -45), (1.75, -20.5, -43.5, -40.5),
                   (1.95, -20, -36, -38.5), (2.3, -22, -35, -39.5), (2.9, -20.5, -37, -40.5),
                   (4.12, -22.5, -38, -41), (4.3, -23.5, -35, -41), (5.05, -21, -37.5, -42.5),
                   (5.42, -21.5, -35.5, -41.5), (5.85, -19.5, -33.5, -39.5), (6.2, -19.5, -36, -42),
                   (7.0, -21.5, -35, -39.5), (8.1, -19, -35, -38.5), (9.4, -21, -36.5, -41),
                   (10, -21.5, -38.5, -41)]
    cycle_hz = 17 * (1 + 0.1152 * walk(2.1))
    throb = np.sin(2 * np.pi * np.cumsum(cycle_hz) / SR)
    boom_db, hum_db, rattle_db = curves(load_levels)
    upper = rattle(rattle_db) + buzz(throb) + panel_tone(throb) + panel_hum(throb, hum_db)
    lower = deck_drum(throb) + deep_rumble(throb) + hull_boom(throb, boom_db)
    return upper + lower + beats()


def scene():
    """Linear superposition: spray hiss, console knocks and ticks, steering and motor add."""
    return spray_hiss() + knocks() + ticks() + moan() + steering() + swells() + motor()


def record(dry):
    """Band limiting and saturation: the phone drops deepest bass, rounds loud peaks and cuts the top."""
    bass_cut = signal.butter(2, 30, "high", fs=SR, output="sos")
    top_cut = signal.ellip(8, .2, 70, 15730, fs=SR, output="sos")
    rounded = np.tanh(1.343 * signal.sosfilt(bass_cut, dry)) / 1.24
    return signal.sosfilt(top_cut, rounded)


dry = scene()
out = record(dry)
transcribe(out)
```